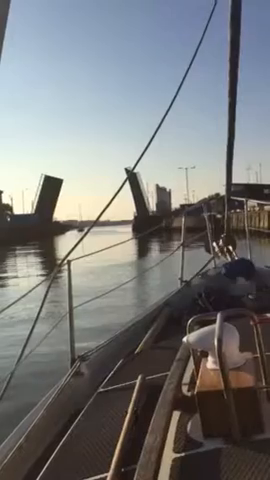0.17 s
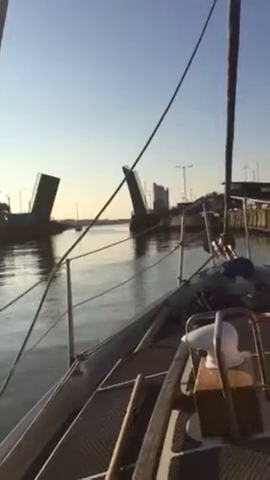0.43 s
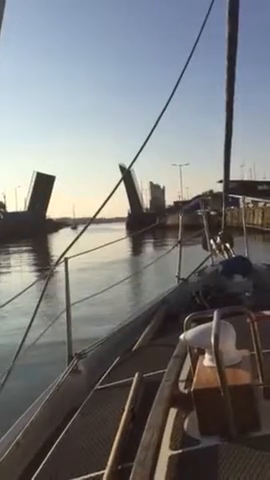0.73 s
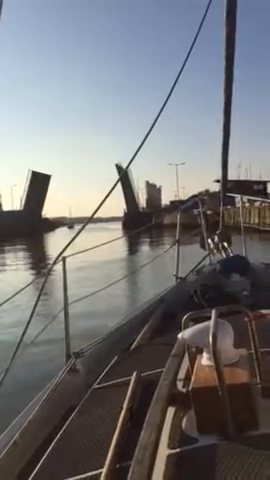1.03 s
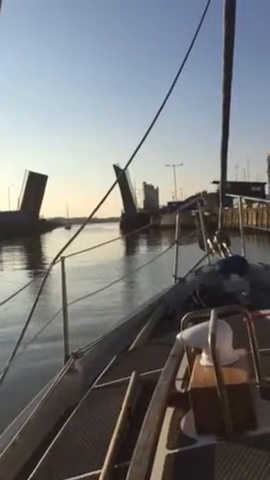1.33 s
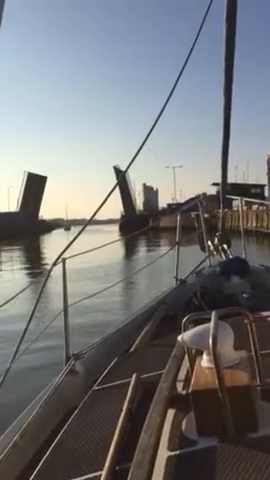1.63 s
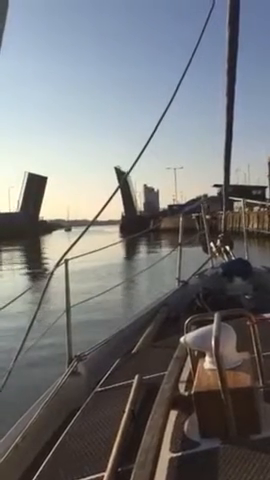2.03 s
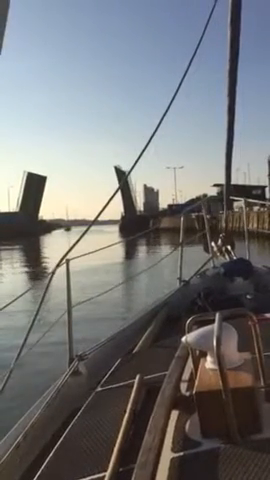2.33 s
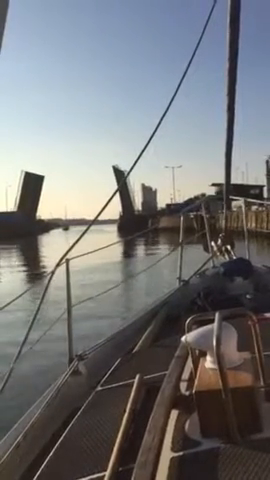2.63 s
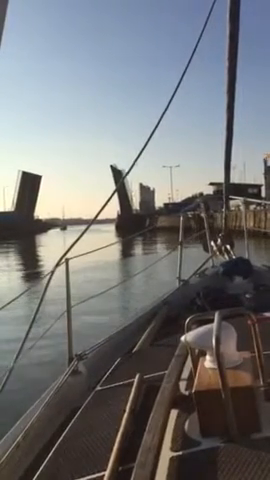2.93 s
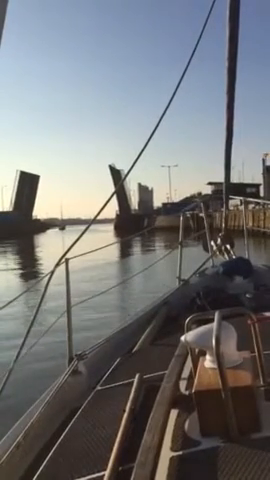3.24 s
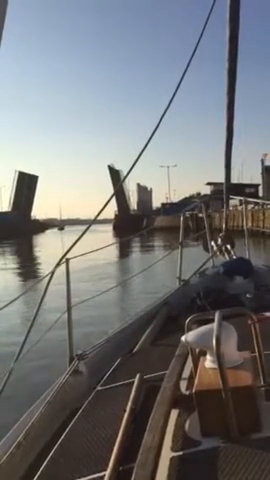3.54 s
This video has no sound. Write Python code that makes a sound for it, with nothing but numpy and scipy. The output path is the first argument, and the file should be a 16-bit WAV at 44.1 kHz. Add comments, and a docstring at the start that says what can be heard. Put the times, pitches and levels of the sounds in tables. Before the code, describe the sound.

A sailing boat's inboard diesel idles in a deep throb with loose metallic rattling, revs up once with two dull knocks and a brief watery hiss, then settles; heard close from the deck, open air.

```python
"""On deck of a sailing boat in a calm harbour: the inboard diesel idles, is revved once and sinks back.
Sine tones at multiples of its firing rate sweep through the hull's resonances; throbbing noise adds exhaust.
Struck noise and fading tones make a loose rattling fitting, and two knocks near the top of the rev.
A short watery hiss follows the top. Thin whines, squeaks, clinks and plops come and go.
Small gurgling bubbles and a faint wash of filtered noise lie underneath."""
import sys
import numpy as np
from scipy import signal
from scipy.fft import rfft, irfft, next_fast_len
from scipy.io import wavfile
from scipy.ndimage import uniform_filter1d, map_coordinates

SR = 44100
rng = np.random.default_rng(int(sys.argv[2]) if len(sys.argv) > 2 else 0)


def log_audio(samples):
    """Write samples as a 16-bit WAV file to the path given in sys.argv[1]."""
    # one column per channel
    frames = np.atleast_2d(samples).T
    # limit to full scale, then quantise
    limited = np.clip(frames, -1, 1)
    pcm = np.round(limited * 32767).astype(np.int16)
    wavfile.write(sys.argv[1], SR, pcm)


N = 162729

# Engine speed: [t/s, firings per second]
ENGINE_SPEED = [(0.0, 22.9), (0.25, 22.4), (0.57, 23), (1.06, 23.1), (1.25, 28.8), (1.37, 32.4),
                (1.51, 38.1), (1.63, 43.7), (1.76, 47.3), (1.91, 41.5), (2.06, 38.5), (2.37, 32.7),
                (2.65, 28.1), (2.9, 24.6), (3.1, 23.9), (3.69, 23.4)]
# Tones of the engine: [multiple of the firing rate, relative level/dB]
ENGINE_ORDERS = [(1, 12.5), (2, 4), (3, 1.5), (4, 0), (5, -3), (6, -4.5), (7, -11), (8, -1), (9, -1)]
# How strongly the hull answers each pitch: [f/Hz, level/dB]
HULL_RESPONSE = [(22, -93.5), (30, -63), (35, -53), (41, -43.5), (46, -39), (51, -42.5), (57, -28.5),
                 (62, -42.5), (70, -32.5), (79, -40), (86, -40), (94, -38), (103, -37), (115, -43),
                 (132, -41.5), (150, -47.5), (200, -51), (400, -76.5)]
# Rise and fall of all the engine tones together: [t/s, relative level/dB]
DRONE_LEVEL = [(0, -2.5), (1.0, -0.5), (1.24, -3.5), (1.32, -5.5), (1.38, 4.5), (1.47, -2.5), (1.65, -3),
               (1.76, 4), (1.85, -3.5), (1.96, 1), (2.2, -4), (2.35, 0), (2.47, -2.5), (2.62, -2),
               (2.78, -0.5), (2.9, -7), (3.03, -7), (3.12, 0), (3.69, 0.5)]
LOAD_ORDER = 3  # the tone that swells under throttle
LOAD_DB_PER_ACCEL = 0.2221  # its swell at top speed, dB per (firings per second, per second)
ORDER_WAVER_DB = 1.22  # unsteadiness of the lowest tone, dB
ORDER_WAVER_GROWTH = 0.37  # power by which higher tones waver more
# Exhaust rumble and engine clatter over time: [t/s, level/dB]
RUMBLE_LEVEL = [(0, -38), (.45, -40), (1.0, -40), (1.18, -34.5), (1.33, -40), (1.55, -36), (1.78, -36),
                (1.92, -38), (2.1, -38.5), (2.25, -44), (2.6, -46), (3.0, -40), (3.3, -43), (3.56, -40),
                (3.69, -42)]
CLATTER_LEVEL = [(0, -57.5), (.2, -60), (.4, -62.5), (.66, -60.5), (1.04, -58), (1.22, -59.5), (1.35, -60),
                 (1.54, -58), (1.77, -54), (1.92, -57.5), (2.1, -59), (2.22, -61), (2.78, -63.5),
                 (3.22, -61), (3.69, -61.5)]
# Tone colour of rumble, clatter and exhaust roar: [f/Hz, relative level per Hz/dB]
RUMBLE_COLOUR = [(20, -49), (38, -22), (60, 4), (90, 4.5), (125, -1.5), (160, -1.5), (195, -4.5),
                 (245, -9.5), (305, -8), (360, -15), (480, -18), (650, -22.5), (900, -37.5), (2000, -72)]
CLATTER_COLOUR = [(300, -11.5), (600, 5.5), (900, 5), (1180, 4), (1400, -2.5), (1600, -1.5), (2000, -2.5),
                  (2350, -5), (3000, -9), (3600, -14), (4500, -26.5), (8000, -40)]
ROAR_COLOUR = [(60, -47.5), (190, 0.5), (290, -1), (380, -25), (900, -100)]
ROAR_DB, ROAR_DB_PER_OCTAVE = -42, 14  # level at top speed, growth per doubling of speed (dB)

# Lower and upper thin tone of the machinery: [t/s, level/dB]
LOW_WHINE_LEVEL = [(0, -75), (.42, -74), (.52, -84), (.92, -69), (1.08, -77), (1.4, -74), (1.5, -66),
                   (1.62, -74), (2.03, -70), (2.3, -78.5), (2.63, -63), (2.85, -83), (3.01, -65.5),
                   (3.24, -67.5), (3.35, -75.5), (3.69, -77.5)]
HIGH_WHINE_LEVEL = [(.15, -73), (.33, -82), (.45, -73.5), (.62, -80), (.8, -73), (1.4, -83), (3.69, -80)]
LOW_WHINE_HZ, HIGH_WHINE_HZ = 2566, 2869

# Blows of the loose fitting: [t/s, chatter level/dB, level of its body over the chatter/dB]
RATTLES = [(.0805, -47, 0.5), (.1167, -63, 6), (0.171, -47, -1.5), (0.2135, -64, 7), (0.2624, -50.5, 1),
           (.3045, -61, -4), (0.354, -59.5, 0), (0.5623, -56.5, -2), (0.7415, -56, -2), (0.8289, -43, -3),
           (0.9154, -45, -3.5), (.9587, -59, -2), (1.0002, -54.5, 1), (1.2128, -49.5, -1.5),
           (1.5875, -59, 7), (2.2278, -62.5, 3), (2.311, -58, 0.5), (3.4196, -48.5, -5), (3.5055, -57, 2.5),
           (3.5923, -48, -2.5)]
# Tone colour of its chatter and of its lower thud: [f/Hz, relative level per Hz/dB]
CHATTER_COLOUR = [(600, -24), (1600, -9), (2300, -1.5), (2900, -2), (3700, 5.5), (4300, -6.5), (5000, -6.5),
                  (6100, -4), (7300, -15.5), (9500, -22), (12000, -20), (15500, -36)]
FITTING_THUD_COLOUR = [(300, -6), (800, -4), (1150, 5), (1450, -7), (1850, -11), (2600, -13), (5000, -36)]
# Tones the fitting rings with: [f/Hz, relative level/dB, time to fade by 60 dB/s]
FITTING_MODES = [(1162, 7, 0.045), (1280, -1.5, 0.064), (1585, -2, 0.049), (1874, -7.5, 0.062),
                 (2234, -7, 0.055), (3436, -11, .05), (3653, -4.5, 0.056), (3980, -11, 0.033),
                 (4340, -12.5, 0.083), (6000, -15, 0.056), (6630, -22, 0.043)]
FITTING_THUD_DB, FITTING_RING_DB = -0.5, -3.5  # added to the level of the body

# Dull knocks: [t/s, level/dB]
KNOCKS = [(1.628, -45.5), (1.726, -38.5)]
# Tone colour of their thud: [f/Hz, relative level per Hz/dB]
KNOCK_COLOUR = [(150, -8), (280, -10), (550, 11.5), (850, -8), (1250, 13), (1600, 1), (2020, 15),
                (2500, -8), (3800, -2), (5000, -12.5), (12000, -44)]
# Tones the struck part rings with: [f/Hz, relative level/dB, time to fade by 60 dB/s]
KNOCK_MODES = [(338, -7, 0.085), (536, 0, 0.13), (672, -2, 0.088), (1223, -5.5, .1), (1750, -5, 0.046),
               (2012, 3.5, 0.036), (2210, -5, .04), (3410, -11, 0.036), (3730, -9, 0.035)]

# Tone colour of the hiss, its spatters and the clink scrapes: [f/Hz, relative level per Hz/dB]
HISS_COLOUR = [(1500, -15), (3000, 8.5), (4300, 6.5), (5200, 1.5), (6500, 3), (9000, -3), (12000, -4),
               (15500, -9)]
HISS_S, HISS_RISE_S, HISS_FALL_S = 1.915, 0.035, 0.057  # moment of its peak, widths of rise and fall (s)
HISS_DB, HISS_PATCHY_DB = -59, 1.5  # level, unevenness (dB)
HISS_CUT = 2.7  # how abruptly it stops (2 = a bell curve)
# Small spatters of water: [t/s, level/dB]
SPATTERS = [(1.374, -61), (1.745, -64), (1.772, -62), (1.887, -60), (1.908, -49)]
# Tone colour of a brief gush of water as the revs fall: [f/Hz, relative level per Hz/dB]
GUSH_COLOUR = [(250, -27), (700, 0), (950, -10), (1600, 3), (1800, -12), (4000, -70)]
GUSH_S, GUSH_WIDTH_S, GUSH_DB = 1.92, 0.12, -60  # middle (s), width (s), level (dB)

# Faint squeaks: [t/s, length/s, f/Hz, level/dB]
SQUEAKS = [(1.297, 0.093, 3580, -64.5), (2.227, 0.1, 1851, -57), (2.398, 0.13, 1150, -62),
           (2.495, 0.095, 3622, -63.5), (2.585, 0.0401, 5120, -72), (2.603, .12, 5490, -77.5),
           (2.626, 0.071, 1760, -63), (2.9, 0.13, 4800, -75.5), (2.991, 0.036, 2680, -65)]
SQUEAK_SAG = 0.017  # share of the pitch lost over a squeak
SQUEAK_PEAK = 0.35  # share of its length at which it is loudest

# Small metal clinks: [t/s, level/dB]
CLINKS = [(2.878, -62.5), (3.036, -58)]
# Tones the metal rings with: [f/Hz, relative level/dB, time to fade by 60 dB/s]
METAL_MODES = [(4100, -5, 0.12), (5710, -2, 0.15), (5800, -2.5, .1), (8662, -15, 0.12), (11677, -8.5, .08)]
CLINK_SCRAPE_DB = -5  # added to the level of the clink

# Bubbles that plop as the revs fall: [t/s, f/Hz, relative level/dB]
PLOPS = [(1.893, 1620, -51), (1.988, 1470, -46), (2.088, 2030, -55)]
PLOP_T60 = 0.068  # time to fade by 60 dB, s

BURBLES_PER_S = 70
BURBLE_HZ, BURBLE_SPREAD = 1399.6, 0.25  # middle pitch (Hz), spread in log pitch
BURBLE_CYCLES = 19.8  # cycles in one unit of a bubble's age
BURBLE_BEND = 0.006  # share of extra phase per unit of age, so the pitch creeps up
BURBLE_DB, BURBLE_SCATTER_DB = -63.5, 1  # typical peak level, spread (dB)
BURBLE_FOLLOWS = 1  # share of the clatter's swell that the bubbles follow

# Wash of water over time: [t/s, level/dB]
WASH_LEVEL = [(0, -76), (.35, -75.5), (.55, -71.5), (.8, -72), (1.2, -71.5), (1.45, -77), (1.7, -77),
              (1.75, -66.5), (1.83, -70.5), (2.05, -75), (2.75, -76), (3.2, -72), (3.69, -74)]
# Tone colour of the wash and of a thin sizzle in the idle: [f/Hz, relative level per Hz/dB]
WASH_COLOUR = [(1500, -23), (3500, 7), (5000, 1.5), (6100, 3.5), (7200, -4), (9600, -4.5), (10500, -10),
               (11600, -4.5), (13000, -12.5), (15500, -10)]
SIZZLE_COLOUR = [(5200, -25), (5650, 0), (5800, -2), (6200, -27)]
SIZZLE_S, SIZZLE_WIDTH_S, SIZZLE_DB = 0.56, 0.06, -75.5  # middle (s), width (s), level (dB)

TOP_HZ = 15720  # nothing is kept from here up


def amp(db):
    """Turn decibels into gain."""
    return 10 ** (np.asarray(db) / 20)


def unit(x):
    """Scale a signal to an rms of 1."""
    return x / np.sqrt(np.mean(x ** 2) + 1e-20)


def along(points, hz):
    """Read (Hz, value) points on a log pitch axis, as the ear hears pitch."""
    f, v = np.transpose(points)
    return np.interp(np.log(hz + 1), np.log(f + 1), v)


def clock():
    """Give the time of each sample in seconds."""
    return np.arange(N) / SR


def curve(rows):
    """Join (s, value) points by straight lines, one value per sample."""
    return np.interp(clock(), *np.transpose(rows))


def wobble(rate):
    """Draw a smooth random curve through `rate` random points a second."""
    points = rng.standard_normal(int(N * rate / SR) + 4)
    return map_coordinates(points, [clock() * rate])


def bell(s, width):
    """Swell and fade smoothly around time s."""
    return np.exp(-.5 * ((clock() - s) / width) ** 2)


def strike(s, attack, t60):
    """Shape a blow at time s: a quick rise, then a fade by 60 dB in t60 seconds."""
    t = np.maximum(clock() - s, 0)
    return (1 - np.exp(-t / attack)) * np.exp(-np.log(1000) * t / t60)


def filtered(x, response):
    """Multiply the spectrum of x by a gain for each frequency."""
    m = next_fast_len(N + SR // 2)
    return irfft(rfft(x, m) * response(np.fft.rfftfreq(m, 1 / SR)), m)[:N]


def noise(colour, patchy_db=0):
    """Make coloured noise of rms 1, with drifting patches of random gain in time and pitch."""
    z = signal.stft(rng.standard_normal(N), nperseg=1024)[2]
    field = rng.standard_normal(z.shape)
    field = uniform_filter1d(field, size=3, axis=0)
    field = uniform_filter1d(field, size=7, axis=1)
    patchy = signal.istft(z * amp(patchy_db * unit(field)), nperseg=1024)[1][:N]
    return unit(filtered(patchy, lambda hz: amp(along(colour, hz))))


def throb(phase, depth_db):
    """Swell the gain once per firing, keeping its rms at 1."""
    return unit(amp(depth_db * np.cos(phase)))


def modal(hits, modes, attack):
    """Let blows (s, dB) ring a body's own tones, a little differently each time."""
    ring = np.zeros(N + SR)
    t = np.arange(SR // 6) / SR
    for s, db in hits:
        for hz, level, t60 in modes:
            gain = amp(db + level + rng.normal(0, 1.3))
            fade = np.exp(-np.log(1000) * t / t60) * (1 - np.exp(-t / attack))
            tone = np.sin(2 * np.pi * hz * t + rng.uniform(0, 2 * np.pi))
            ring[round(s * SR):][:len(t)] += gain * fade * tone
    return ring[:N]


def engine():
    """Firing tones sound through the hull, with rumble, roar and clatter that pulse at each firing."""
    speed = uniform_filter1d(curve(ENGINE_SPEED), size=2205, mode="nearest")
    phase = 2 * np.pi * np.cumsum(speed) / SR
    # Only speeding up counts as load, and more so at high speed
    accel = np.maximum(np.gradient(speed) * SR, 0)
    load_db = LOAD_DB_PER_ACCEL * accel * (speed - speed.min()) / np.ptp(speed)

    drone = np.zeros(N)
    for order, (_, db) in enumerate(ENGINE_ORDERS, 1):
        level_db = db + along(HULL_RESPONSE, order * speed)
        if order == LOAD_ORDER:
            level_db = level_db + load_db
        waver_db = ORDER_WAVER_DB * order ** ORDER_WAVER_GROWTH * wobble(14)
        jitter = 0.07 * order * wobble(16)
        tone = np.sin(order * phase + rng.uniform(0, 2 * np.pi) + jitter)
        drone += amp(level_db + waver_db) * tone
    drone *= amp(curve(DRONE_LEVEL))

    rumble = amp(curve(RUMBLE_LEVEL)) * noise(RUMBLE_COLOUR, patchy_db=1.5)
    rumble *= throb(phase, depth_db=0.8)
    roar_db = ROAR_DB + ROAR_DB_PER_OCTAVE * np.log2(speed / speed.max())
    roar = amp(roar_db) * noise(ROAR_COLOUR) * throb(phase, depth_db=3.0)
    clatter = amp(curve(CLATTER_LEVEL) + 1.0 * wobble(45)) * noise(CLATTER_COLOUR, patchy_db=3.0)
    clatter *= throb(phase, depth_db=1.1)
    return drone + rumble + roar + clatter


def whine():
    """Two thin steady-pitched tones of the machinery waver and come and go."""
    out = np.zeros(N)
    for hz, level in [(LOW_WHINE_HZ, LOW_WHINE_LEVEL), (HIGH_WHINE_HZ, HIGH_WHINE_LEVEL)]:
        gain = amp(curve(level) + 3.4 * wobble(26.18))
        out += gain * np.sin(2 * np.pi * hz * clock() + 0.87 * wobble(22))
    return out


def rattle():
    """A loose fitting, shaken by the engine, chatters in short bursts, thuds and rings briefly."""
    chatter = sum(amp(db) * strike(s, attack=0.0013, t60=0.037) for s, db, _ in RATTLES)
    body = [(s, db + body_db) for s, db, body_db in RATTLES]
    thud = sum(amp(db) * strike(s, attack=0.0018, t60=0.085) for s, db in body)
    ring = modal(body, FITTING_MODES, attack=0.0011)
    return (chatter * noise(CHATTER_COLOUR)
            + amp(FITTING_THUD_DB) * thud * noise(FITTING_THUD_COLOUR)
            + amp(FITTING_RING_DB) * ring)


def knocks():
    """Something on deck knocks twice near the top of the rev: a thud of noise and ringing tones."""
    blows = sum(amp(db) * strike(s, attack=0.0019, t60=0.058) for s, db in KNOCKS)
    return blows * noise(KNOCK_COLOUR) + modal(KNOCKS, KNOCK_MODES, attack=0.0036)


def hiss():
    """Grainy spray, spatters and a hollow gush, like a spurt of water that stops quickly."""
    t = clock() - HISS_S
    rise = (t / HISS_RISE_S) ** 2
    fall = np.abs(t / HISS_FALL_S) ** HISS_CUT
    swell = np.exp(-.5 * np.where(t < 0, rise, fall))
    spray = amp(HISS_DB + 2.4 * wobble(600)) * swell * noise(HISS_COLOUR, patchy_db=HISS_PATCHY_DB)
    drops = sum(amp(db) * strike(s, attack=0.0011, t60=0.033) for s, db in SPATTERS)
    gush = amp(GUSH_DB + 1.6 * wobble(80)) * bell(GUSH_S, GUSH_WIDTH_S)
    return spray + drops * noise(HISS_COLOUR) + gush * noise(GUSH_COLOUR, patchy_db=-1.0)


def squeaks():
    """Short thin whistles swell, fade and sag in pitch."""
    out = np.zeros(N)
    for s, length, hz, db in SQUEAKS:
        progress = np.clip((clock() - s) / length, 0, 1)
        pitch = hz * (1 - SQUEAK_SAG * (progress - .5) + 0.0016 * wobble(120))
        swell = np.sin(np.pi * np.interp(progress, [0, SQUEAK_PEAK, 1], [0, .5, 1]))
        out += amp(db) * swell * np.sin(2 * np.pi * np.cumsum(pitch) / SR)
    return out


def clinks():
    """Metal in the rigging touches lightly: a tiny scrape of noise and a ring of unsteady tones."""
    ring = np.zeros(N)
    for s, db in CLINKS:
        for hz, level, t60 in METAL_MODES:
            tone = np.sin(2 * np.pi * hz * clock() + 1.0 * wobble(440))
            ring += amp(db + level) * strike(s, attack=0.002, t60=t60) * tone
    scrape = sum(amp(db + CLINK_SCRAPE_DB) * strike(s, attack=0.001, t60=0.081) for s, db in CLINKS)
    return ring + scrape * noise(HISS_COLOUR)


def plops():
    """A few larger bubbles each ring briefly, with a rough, unsteady tone."""
    out = np.zeros(N)
    for s, hz, db in PLOPS:
        tone = np.sin(2 * np.pi * hz * clock() + 0.53 * wobble(270))
        out += 2 * amp(db) * strike(s, attack=0.0056, t60=PLOP_T60) * tone
    return out


def bell_spread(share):
    """Turn even random shares (0 to 1) into a bell-like spread around 0, of deviation 1."""
    return np.log(share / (1 - share)) * np.sqrt(3) / np.pi


def burble():
    """Many small bubbles ring beside the hull, louder and softer along with the clatter."""
    count = int(BURBLES_PER_S * N / SR)
    start, pitch, size = rng.uniform(.01, 1.0, (count, 3)).T
    hz = BURBLE_HZ * np.exp(BURBLE_SPREAD * bell_spread(pitch))[:, None]
    at = (start * N).astype(int)
    swell_db = curve(CLATTER_LEVEL) - curve(CLATTER_LEVEL).mean()
    level_db = BURBLE_DB + BURBLE_SCATTER_DB * bell_spread(size) + BURBLE_FOLLOWS * swell_db[at]
    k = np.arange(SR // 10)
    age = hz * k / SR / BURBLE_CYCLES
    envelope = 2 * age * np.exp(1 - 2 * age)  # peaks at 1
    tone = np.sin(2 * np.pi * BURBLE_CYCLES * age * (1 + BURBLE_BEND * age))
    bubbles = amp(level_db)[:, None] * envelope * tone
    # Add every bubble into the output at its own start
    return np.bincount((at[:, None] + k).ravel(), bubbles.ravel(), N)[:N]


def water():
    """A faint, fizzing wash of noise runs along the hull, with one thin sizzle."""
    wash = amp(curve(WASH_LEVEL) + 1.3 * wobble(160)) * noise(WASH_COLOUR, patchy_db=3.0)
    sizzle = amp(SIZZLE_DB) * bell(SIZZLE_S, SIZZLE_WIDTH_S) * noise(SIZZLE_COLOUR)
    return wash + sizzle


def scene():
    """Add up everything as heard from the deck, in open air, with no echo."""
    boat = engine() + whine() + rattle() + knocks()
    details = hiss() + squeaks() + clinks()
    background = plops() + burble() + water()
    return (boat + details + background)[None]


def record(dry):
    """Cut off everything from the band limit upward."""
    return filtered(dry[0], lambda hz: hz < TOP_HZ)[None]


dry = scene()
out = record(dry)
log_audio(out)
```